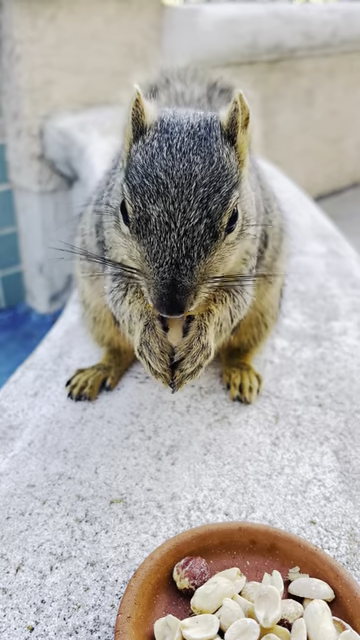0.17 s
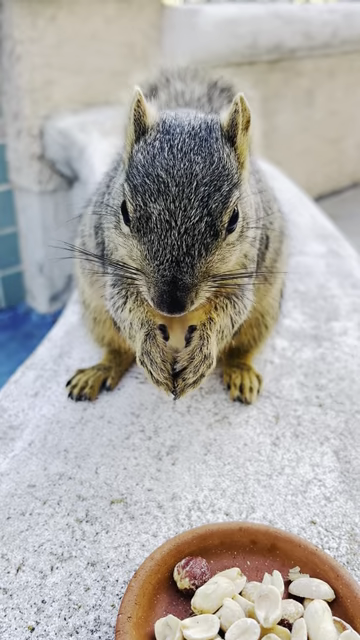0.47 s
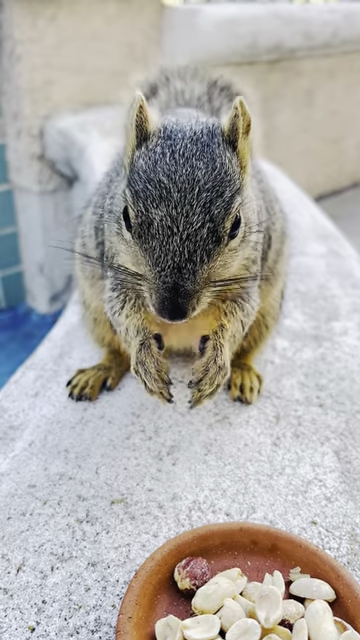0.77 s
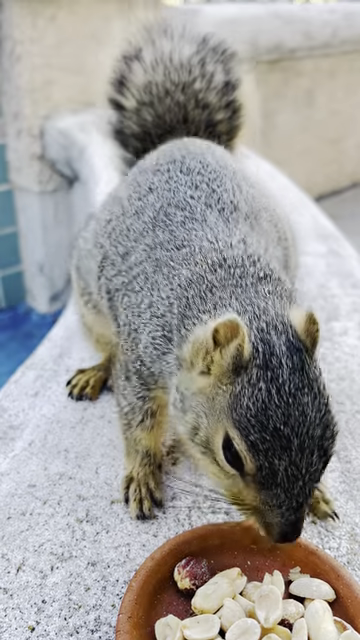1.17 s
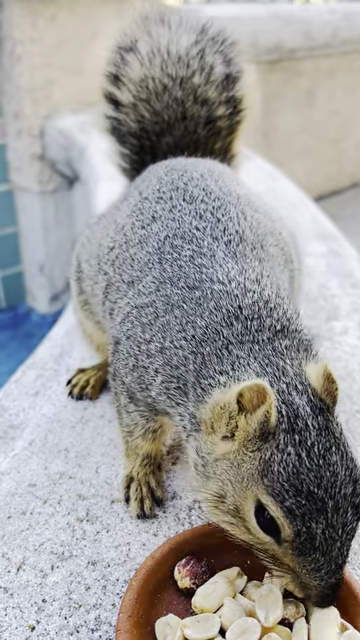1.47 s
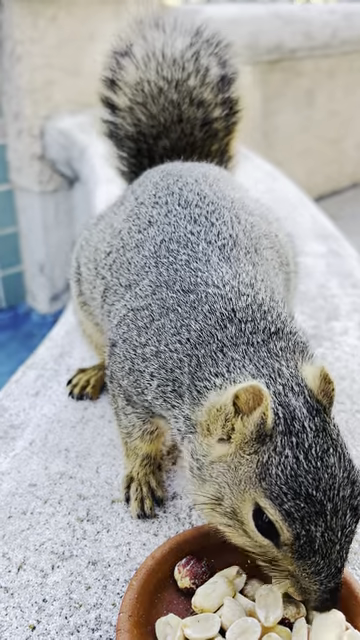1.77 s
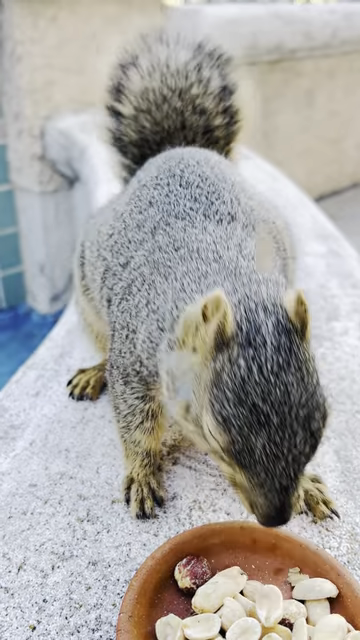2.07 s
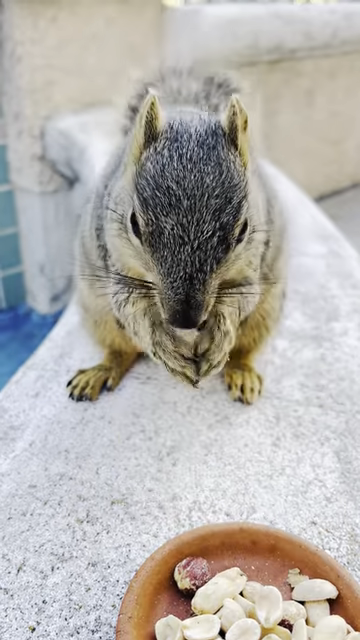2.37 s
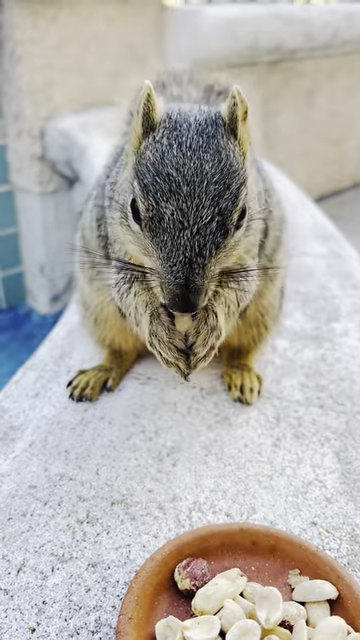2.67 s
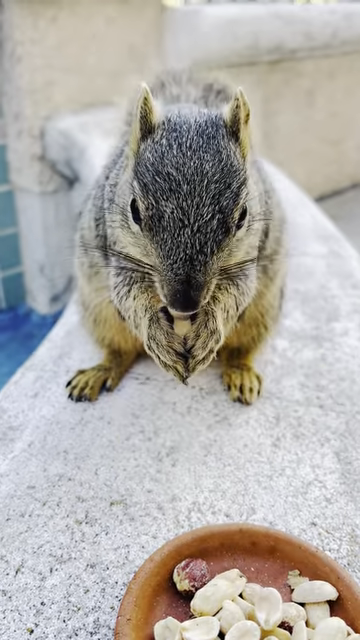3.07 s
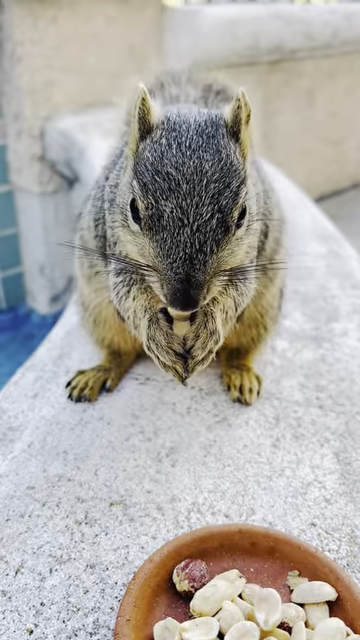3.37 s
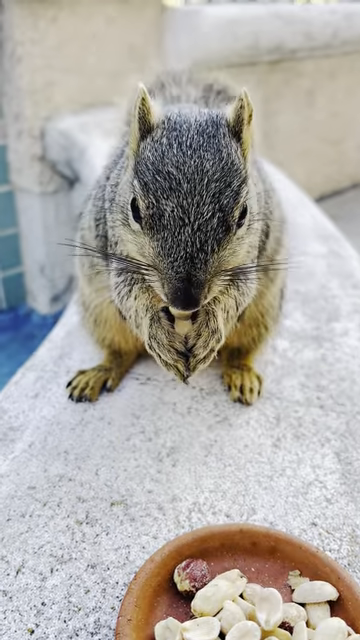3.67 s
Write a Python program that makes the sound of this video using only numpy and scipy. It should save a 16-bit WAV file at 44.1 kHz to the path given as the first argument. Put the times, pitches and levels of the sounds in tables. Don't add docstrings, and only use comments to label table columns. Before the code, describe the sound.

A squirrel gnaws peanuts in brittle, close-up cracks and gritty grinding, then nuts tap and scrape a small clay dish before gnawing resumes; quiet yard with low traffic rumble, close stereo phone microphone.

```python
import sys
import numpy as np
from scipy import signal
from scipy.fft import rfft, irfft, next_fast_len
from scipy.io import wavfile
from scipy.ndimage import uniform_filter1d, map_coordinates

SR = 44100
rng = np.random.default_rng(int(sys.argv[2]) if len(sys.argv) > 2 else 0)


def voltage_ratio(level):
    return 10 ** (np.asarray(level, float) / 20)


def waveform_to_disk(signal):
    frames = np.transpose(np.atleast_2d(signal))
    scaled = np.clip(frames, -1, 1) * 32767
    samples = np.round(scaled).astype(np.int16)
    wavfile.write(sys.argv[1], SR, samples)


N = 168903

SNAP_S, SNAP_AFTER_DB = 0.0034, -18.5

# (time [s], peak level [dB], jaw knock [dB], brightness [dB per octave])
CRUNCHES = [(0.1031, -43.5, -6, 6.5), (0.1148, -41.5, -16, -8.5), (0.463, -46, -7.5, 5),
            (0.545, -57.5, 2.5, 28), (0.7169, -35.5, -12, 7), (0.8995, -31.5, -20.5, 6.5),
            (1.077, -36.5, -15, 4), (2.4363, -46, -18, 11), (2.564, -38, -37, 10.5),
            (2.771, -42.5, -14, 14), (2.8781, -42.5, -7, 9), (3.2942, -46, -5, 8),
            (3.414, -33.5, -14.5, 8.5), (3.5828, -55, -7, 7), (3.696, -47, -7, 8), (3.7529, -31, -16.5, 9)]
# (time [s], peak level [dB], jaw knock [dB], brightness [dB per octave])
SNAPS = [(0.0713, -52, -27, 21), (0.0886, -59, -16, 10), (0.1916, -45, -14, 3),
         (0.378, -40.5, -1.5, 15), (0.3859, -46, -1, 4), (0.439, -50, -8, 14),
         (0.7122, -50.5, -4, 11), (1.1492, -52, -21, 22), (1.2491, -37, -19, 24),
         (1.2575, -28, -30, 1), (1.2626, -47, -2.5, 24), (1.4323, -42.5, -25, -4),
         (2.227, -56.5, -17, -1), (2.4028, -41.5, -9, 19), (2.4477, -46, -20, 16),
         (2.531, -34.5, -27.5, -3.5),
         (2.7774, -43.5, -4, 5), (2.835, -42, -22, 10), (2.9488, -39.5, -6.5, 4),
              (3.066, -41, -15.5, 18.5), (3.217, -45, -7, 14), (3.223, -41, -10.5, 2),
              (3.2404, -45.5, -10, 12), (3.269, -42, -26, 0), (3.3034, -43, -9, -6), (3.3442, -50, -10, 7),
              (3.3948, -44, -19, 23), (3.4549, -46, -8, 30), (3.4864, -52, -9, 22), (3.5534, -48.5, -2, -9)]


def bites():
    out = np.zeros(N + SR)
    crunches = (CRUNCHES, 0.0066, -2)  # rows, trail length [s], trail level [dB]
    snaps = (SNAPS, SNAP_S, SNAP_AFTER_DB)
    for rows, length_s, after_db in [crunches, snaps]:
        for s, db, knock_db, slope_db in rows:
            jaw_hz = 2300 * (1 + 0.025 * rng.standard_normal())
            jaw_modes = [(jaw_hz, knock_db, 0.011), (4600, knock_db - 3, 0.0055)]
            jaw = ring(jaw_modes, scatter_db=2)
            add(out, s, voltage_ratio(db) * (crackle(length_s, after_db, slope_db, count=12) + jaw))
    return out[:N]


# (frequency [Hz], level [dB])
NUT_COLOUR = [(500, -13), (1700, 5), (3000, 1.5), (6000, 7.5), (8000, -4), (10500, 0.5), (12500, -2.5),
              (14000, -4.5), (15900, -8), (16700, -8)]


def crackle(length_s, after_db, slope_db, count):
    t = np.arange(2048) / SR
    draw = rng.random((count, 2))
    delay = (draw[2:, 0] ** 1.5 * 2 - 0.3) * length_s
    when = 0.0045 + np.r_[0, -0.0015, delay]
    weaker_db = after_db + 6 * (draw[2:, 1] - 0.5) * 2 - 8 * draw[2:, 0]
    size = np.r_[1, 0.3, voltage_ratio(np.minimum(weaker_db, -7))]
    age = t - when[:, None]
    cracks = size[:, None] * (age >= 0) * np.exp(-abs(age) / 0.00025)
    shape = cracks.sum(axis=0)
    ripple = 1.5 * rng.standard_normal(8)

    def colour(hz):
        tilt_db = slope_db * np.log2(np.clip(hz, 2500, 13500) / 8000)
        ripple_db = np.interp(hz / 2400, range(len(ripple)), ripple)
        return closed(NUT_COLOUR)(hz) * voltage_ratio(tilt_db + ripple_db)

    x = filtered(shape * rng.standard_normal(len(t)), colour)
    return x / abs(x).max()


def ring(modes, scatter_db):
    t = np.maximum(np.arange(2048) / SR - 0.0045, 0)
    out = np.zeros(len(t))
    for hz, db, t60 in modes:
        fade_db = db + scatter_db * rng.standard_normal() - 60 * t / t60
        out += voltage_ratio(fade_db) * np.sin(2 * np.pi * hz * t)
    return out


# (time [s], peak level [dB],
# brightness [dB per octave])
TICKS = [(.0024, -58, -3), (.0483, -55, 11), (.055, -55, -6), (.1514, -62, -3), (.2234, -54, 4),
         (.3511, -54, -1), (0.552, -50, 2), (.5614, -54, 4), (0.693, -54, -8), (.728, -59, 6),
         (.7936, -65, -4), (.85, -62, -2), (.906, -47, -10), (.9524, -60, 8), (0.9602, -50, 12),
         (1.021, -54, 14), (1.0435, -60, 16), (1.066, -62, 2), (1.2201, -51, -4), (1.445, -46, -6),
         (1.4524, -45, 6), (1.4624, -62, -6), (1.5194, -62, 8), (1.5364, -55, 12), (1.6776, -48, 0),
         (1.8774, -61, 6), (1.896, -58, 12), (1.9734, -64, 12), (2.431, -48, 0), (2.4415, -39, 7),
         (2.498, -65, 4), (2.5753, -47, 2), (2.7127, -62, 13), (2.732, -54, 6), (2.8474, -56, 2),
         (2.894, -53, 5), (2.957, -45, 0), (3.0522, -56, 9), (3.1213, -62, 8), (3.3256, -58, -6),
         (3.4036, -50, 0), (3.4664, -54, 10), (3.5274, -51, 8), (3.7291, -58, 11), (3.7574, -29, 0)]
# (time [s], peak level [dB], pitch [Hz])
SPLINTERS = [(0.0722, -53, 10200), (0.0874, -45, 10500), (0.105, -46, 3000), (0.1915, -50, 4350),
             (0.377, -44, 10400), (0.385, -53, 4090), (0.7163, -38.5, 4470), (0.9004, -34, 4770),
             (1.077, -36, 9570), (1.2495, -49, 13800), (1.2572, -33, 10100), (2.4033, -44.5, 10400),
             (2.437, -40, 15300), (2.5302, -33.5, 7940), (2.5641, -36, 8400), (2.7716, -53, 10400),
             (2.835, -49, 4600), (2.8789, -47, 10600), (2.951, -36, 13900), (3.0657, -45, 9370),
             (3.223, -44, 10700), (3.2945, -50, 4250), (3.4136, -38, 10500), (3.7515, -30, 11000)]


def ticks():
    out = np.zeros(N + SR)
    for s, db, slope_db in TICKS:
        add(out, s, voltage_ratio(db - 1.5) * crackle(SNAP_S, SNAP_AFTER_DB, slope_db, count=3))
    for s, db, hz in SPLINTERS:
        add(out, s - 0.001, ring([(hz, db - 6, 0.007)], scatter_db=0))
    return out[:N]


# (start time [s], length [s], level [dB], brightness [dB])
CHEWS = [(0.086, 0.082, -70.5, 5), (0.225, 0.11, -82.5, 1), (0.41, 0.12, -75.5, 1), (0.63, 0.025, -84, 14),
         (0.77, 0.09, -80.5, -3), (0.893, 0.13, -77.5, 2), (1.26, 0.071, -78, .1),
         (1.96, 0.032, -82.5, -15), (2.495, 0.055, -71, 10), (2.547, 0.068, -86, 26),
         (2.754, 0.064, -72, 9), (2.85, 0.12, -82.5, 23), (2.946, 0.06, -70, -1), (3.115, 0.044, -79, 15),
         (3.288, 0.052, -68, 2), (3.452, 0.085, -76, 2), (3.773, 0.08, -81, 11)]


def grinding():
    grains_per_s, grain_spread_db = 9000, 2.5
    draw = rng.random((2, N))
    hits = draw[0] < grains_per_s / SR
    grains = hits * voltage_ratio(-grain_spread_db * np.log(draw[1] + 1e-9)) * rng.standard_normal(N)
    dust = grit(grains * voltage_ratio(2 * wobble(60)))
    low = filtered(dust, lambda hz: 1 / (1 + (hz / 8000) ** 4))
    high = dust - low
    pause_db = -4.8 * swell(2.07, 0.31, edge=0.22)
    idle = voltage_ratio(-82.5 + 0.34 * wobble(17.0) + pause_db)
    dull, bright = idle.copy(), idle.copy()
    for s, length_s, db, tilt_db in CHEWS:
        stroke = swell(s, length_s, edge=0.57)
        dull += voltage_ratio(db - tilt_db / 2) * stroke
        bright += voltage_ratio(db + tilt_db / 2) * stroke
    return dull * voltage_ratio(1.5 * wobble(25)) * low + bright * voltage_ratio(2.5 * wobble(25)) * high


# (frequency [Hz], level [dB])
DUST_COLOUR = [(2000, 4), (3500, -3), (6000, -2.5), (8000, -10.5), (11000, -10), (12500, -13), (13700, -10),
               (15900, -17), (16500, -22)]


def grit(rub, tilt=0):
    return unit(filtered(rub, lambda hz: closed(DUST_COLOUR)(hz) * (hz / 8000) ** tilt))


# (time [s], ring level [dB], dry click over the ring [dB])
TAPS = [
    (1.401, -63, 21.5),
    (1.439, -51.5, 19),
    (1.559, -59.5, 22),
    (1.5934, -30, -21),
    (1.7245, -44, 1),
    (1.8503, -50, 3),
    (1.8626, -61.5, 22),
    (2.0267, -57, 6),
]
# (start time [s], length [s], level [dB])
SCRAPES = [
    (1.41, 0.099, -83),
    (1.516, 0.069, -76),
    (1.604, 0.065, -83),
    (1.68, 0.087, -67),
    (1.801, 0.061, -71.5),
    (1.94, 0.021, -81),
    (2.022, 0.012, -66),
]
# (frequency [Hz], level [dB], time to fade by 60 dB [s])
DISH_MODES = [
    (2450, -25, 0.039),
    (3220, -24, 0.022),
    (5200, 1, 0.028),
    (8470, 1.5, 0.015),
    (12600, -19, .008),
    (15400, -22, 0.0052),
]


def dish():
    out = np.zeros(N + SR)
    for s, db, click_db in TAPS:
        clay = ring(DISH_MODES, scatter_db=2.3)
        click = voltage_ratio(click_db) * crackle(SNAP_S, SNAP_AFTER_DB, -1.3, count=4)
        add(out, s, voltage_ratio(db - 7) * (clay + click))
    rub = rng.standard_normal(N) * voltage_ratio(2.5 * wobble(200))
    lifts_db = (-9, -3.0, 12, 9)
    rubbed_modes = [(hz, db + lift, t60 / 1.1) for (hz, db, t60), lift in zip(DISH_MODES[2:], lifts_db)]
    body = unit(signal.fftconvolve(rub, ring(rubbed_modes, scatter_db=0))[:N])
    dust = grit(rub, tilt=1.1)
    push = sum(voltage_ratio(db) * swell(s, length_s, edge=0.21) for s, length_s, db in SCRAPES)
    return out[:N] + push * (body + voltage_ratio(-11) * dust)


# (frequency [Hz], phase lead [radians])
LEFT_LEADS = [(0, 9), (1400, -0.5), (2300, 1.18), (2900, 1.5), (4300, 1.67), (5950, 3), (12500, 9.5),
              (16500, 13.5)]
# (frequency [Hz], level [dB])
LEFT_OVER_RIGHT = [(1000, 27), (2500, -11), (3500, -2), (5500, -4), (7000, 2), (16000, -1.5)]


def ports(x):
    ledge_db, ledge_t60 = -24, 0.06
    lead_hz, lead = np.transpose(LEFT_LEADS)

    def half(hz):
        return voltage_ratio(along(LEFT_OVER_RIGHT, hz) / 2) * np.exp(0.5j * np.interp(hz, lead_hz, lead))

    t = np.arange(4096) / SR
    tail = rng.standard_normal(len(t)) * voltage_ratio(-60 * t / ledge_t60) * (t > 0.002)
    echo = signal.fftconvolve(x, tail / np.linalg.norm(tail))[:N]
    wet = x + voltage_ratio(ledge_db) * echo
    return filtered(wet, lambda hz: voltage_ratio(-14 * (hz > 16000)) * [half(hz), 1 / half(hz)])


# (start time [s], length [s], level [dB], pitch [Hz])
HUM = [
    (0.479, 0.15, -51, 294.3),
    (0.714, 0.33, -55, 285.3),
    (1.997, 0.36, -54.5, 301.6),
    (2.549, 0.304, -50, 295),
    (3.518, 0.45, -55, 296.7),
    (.01, 0.28, -57, 573),
]
# (frequency [Hz], level [dB per Hz])
RUMBLE = [(12, -52), (20, -21), (38, -8.5), (53, -5), (70, 3.5), (118, -7), (182, -8), (221, -8),
          (260, -27.5), (340, -61.5), (570, -120)]
# (frequency [Hz], level [dB per Hz])
TRAFFIC = [(200, -3.5), (300, -6), (450, -9.5), (700, -9), (1000, -14), (1500, -19.5), (2300, -34),
           (3300, -59)]
# (frequency [Hz], level [dB per Hz])
HISS = [(2000, 16.5), (3500, -3), (8000, -8), (12500, -14), (15000, -18), (16000, -30)]


def yard():
    tone = np.zeros(N)
    for s, length_s, db, hz in HUM:
        phase = 2 * np.pi * np.cumsum(hz + 0.81 * wobble(3.61)) / SR
        tone += voltage_ratio(db) * swell(s, length_s, edge=0.14) * np.sin(phase)
    rumble = voltage_ratio(-47.5 + 1.3 * wobble(5.4)) * rush(RUMBLE, patchy_db=-0.06)
    traffic = voltage_ratio(-51.5 + 0.29 * wobble(3.8)) * rush(TRAFFIC, patchy_db=0.77)
    hiss = voltage_ratio(-81) * rush(HISS, patchy_db=4.5)
    return rumble + traffic + tone + hiss


# (frequency [Hz], left-right likeness [0 to 1])
ALIKE = [(60, .9988), (130, .992), (290, .96), (640, .62), (1400, .6), (3000, .3)]


def rush(spectrum, patchy_db):
    z = signal.stft(rng.standard_normal((2, N)), nperseg=1024)[2]
    field = uniform_filter1d(rng.standard_normal(z.shape[1:]), size=6, axis=0)
    field = uniform_filter1d(field, size=8, axis=1)
    pair = signal.istft(z * voltage_ratio(patchy_db * unit(field)), nperseg=1024)[1][:, :N]

    def mid_side(hz):
        turn = np.arccos(np.clip(along(ALIKE, hz), -1, 1)) / 2
        return closed(spectrum)(hz) * [np.cos(turn), np.sin(turn)]

    mid, side = filtered(pair, mid_side)
    return unit(np.array([mid + side, mid - side]))


def swell(s, length_s, edge):
    u = (np.arange(N) / SR - s) / length_s
    to_end = np.minimum(u + edge / 2, 1 + edge / 2 - u)
    return np.sin(np.pi / 2 * np.clip(to_end / edge, 0, 1)) ** 2


def wobble(rate):
    knots = rng.standard_normal(int(N * rate / SR) + 4)
    return map_coordinates(knots, [np.arange(N) * rate / SR])


def add(track, s, x):
    i = max(round((s - 0.003) * SR), 0)
    track[i:i + len(x)] += x


def unit(x):
    return x / np.sqrt(np.mean(x ** 2) + 1e-20)


def along(points, hz):
    f, v = np.transpose(points)
    return np.interp(np.log(hz + 1), np.log(f + 1), v)


def closed(points):
    return lambda hz: voltage_ratio(along(points, hz)) * (hz >= points[0][0]) * (hz <= points[-1][0])


def filtered(x, response):
    m = next_fast_len(x.shape[-1] + 4096)
    spectrum = rfft(x, m) * response(np.fft.rfftfreq(m, 1 / SR))
    return irfft(spectrum, m)[..., :x.shape[-1]]


def scene():
    near = bites() + grinding() + dish() + ticks()
    return ports(near) + yard()


def top_cut(x):
    return signal.sosfilt(signal.butter(12, 16660, fs=SR, output="sos"), x)


def record(dry):
    return top_cut(dry)


dry = scene()
out = record(dry)
waveform_to_disk(out)
```